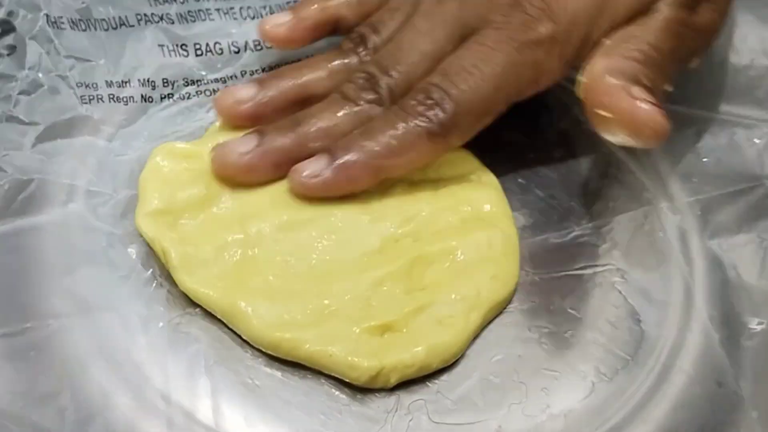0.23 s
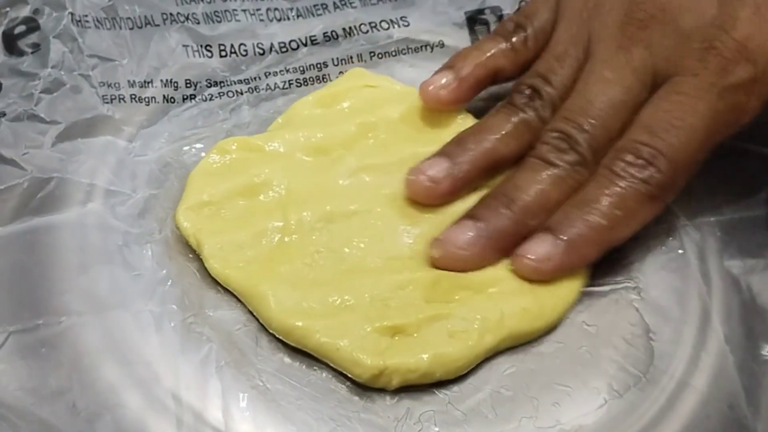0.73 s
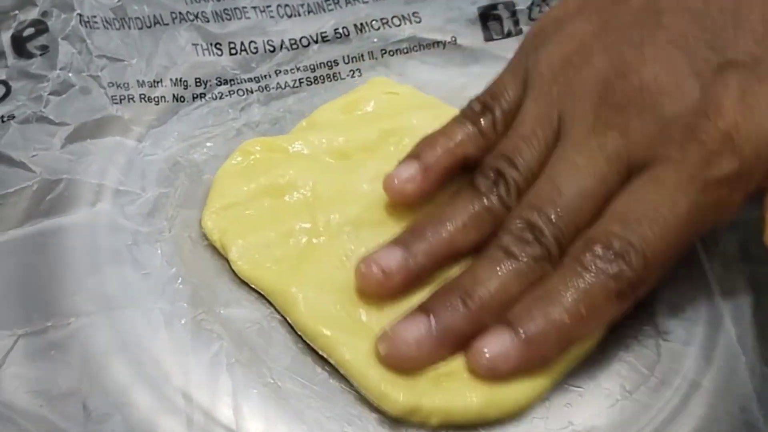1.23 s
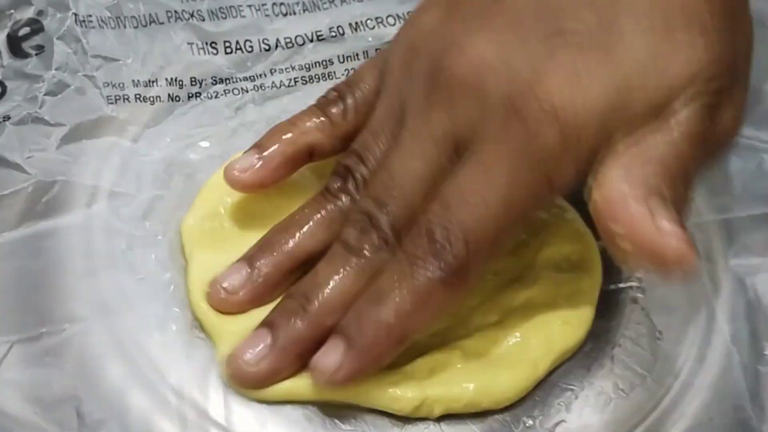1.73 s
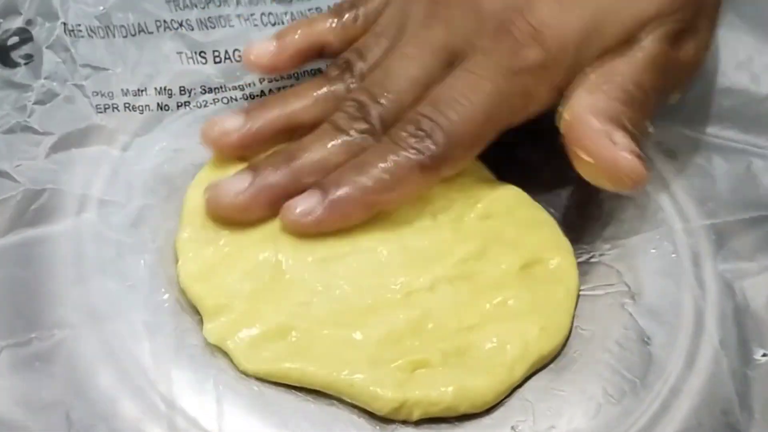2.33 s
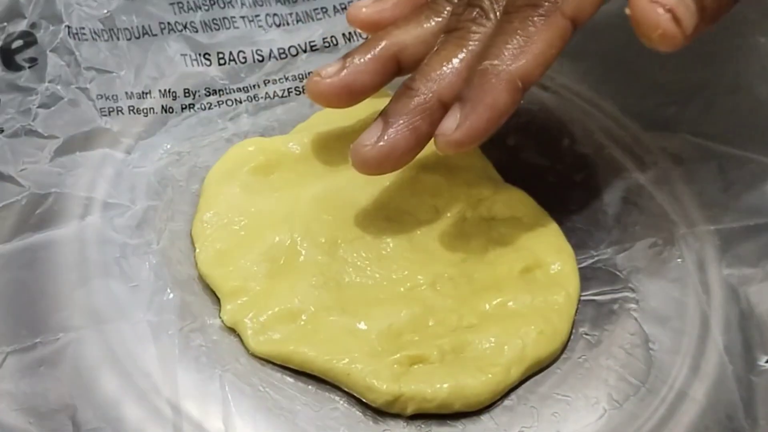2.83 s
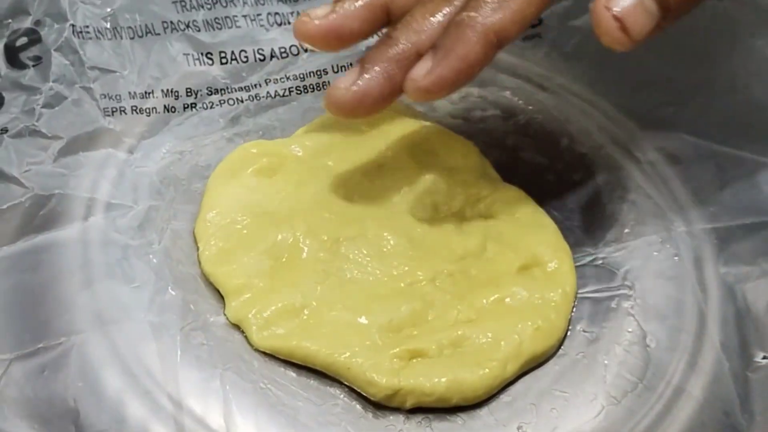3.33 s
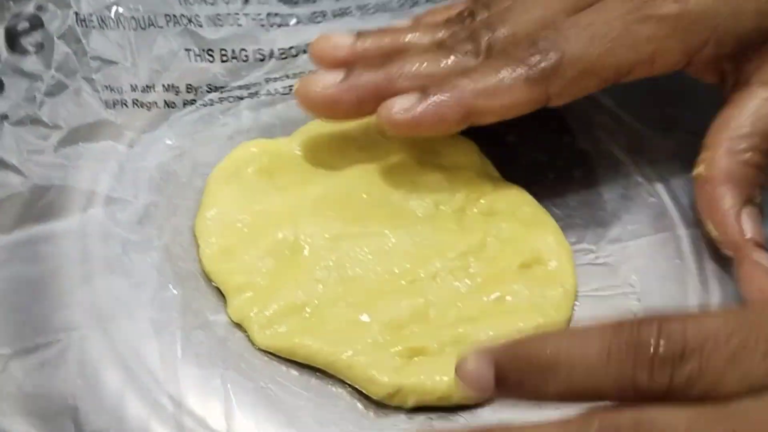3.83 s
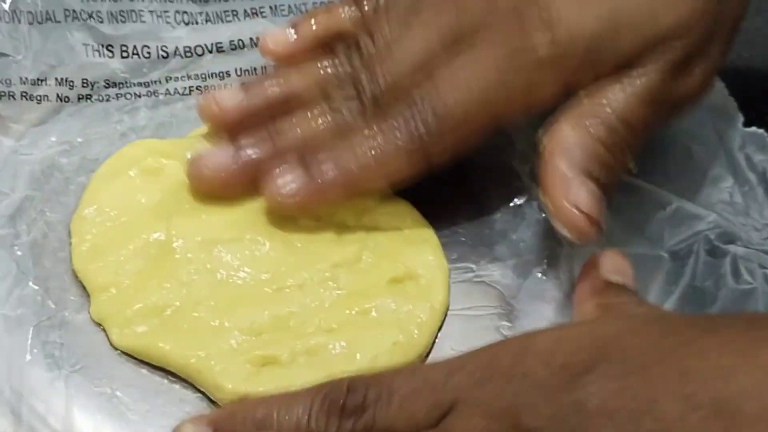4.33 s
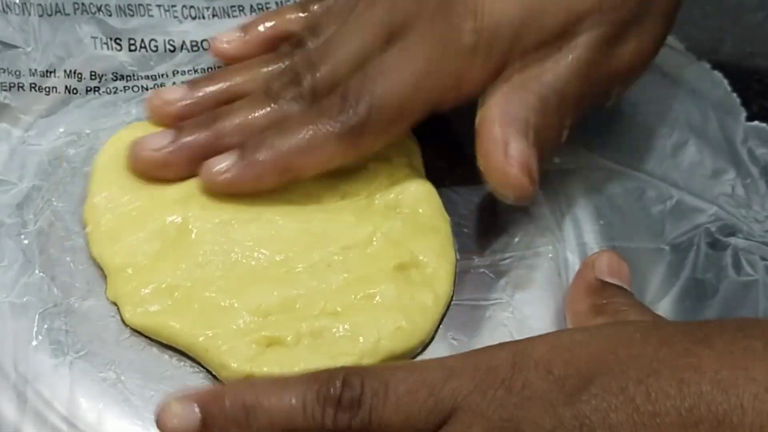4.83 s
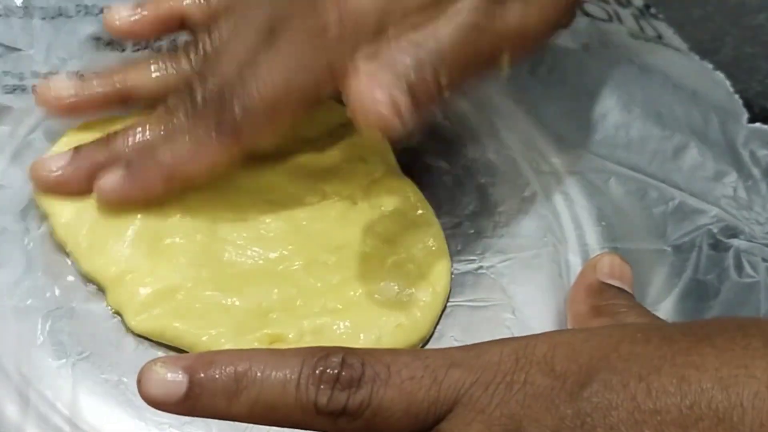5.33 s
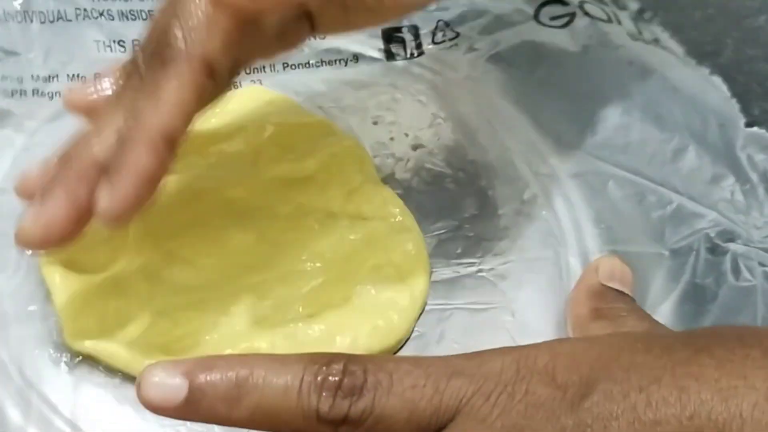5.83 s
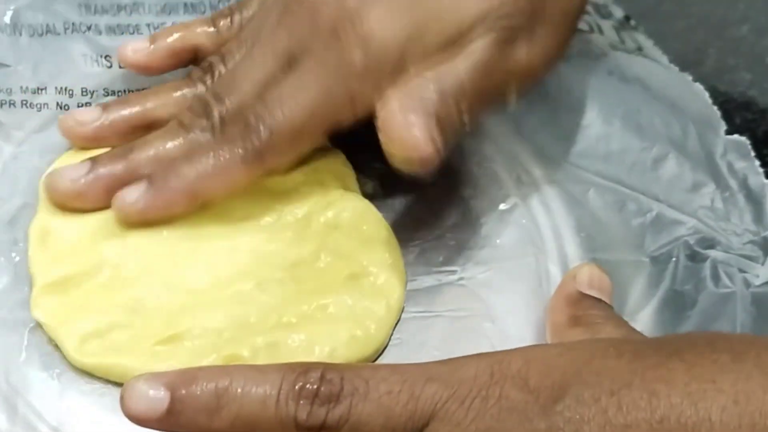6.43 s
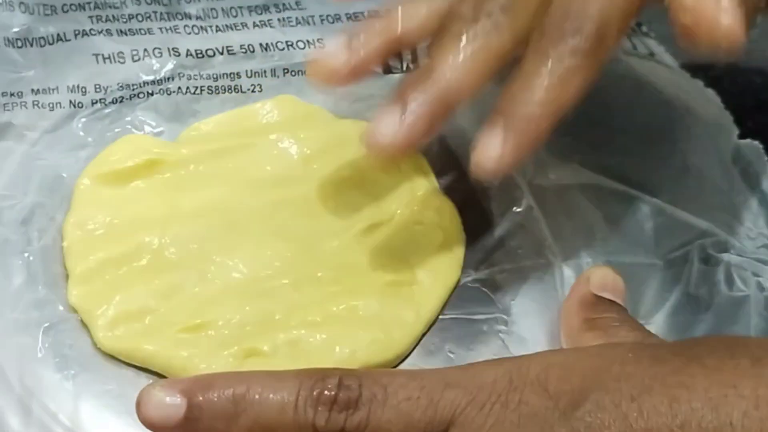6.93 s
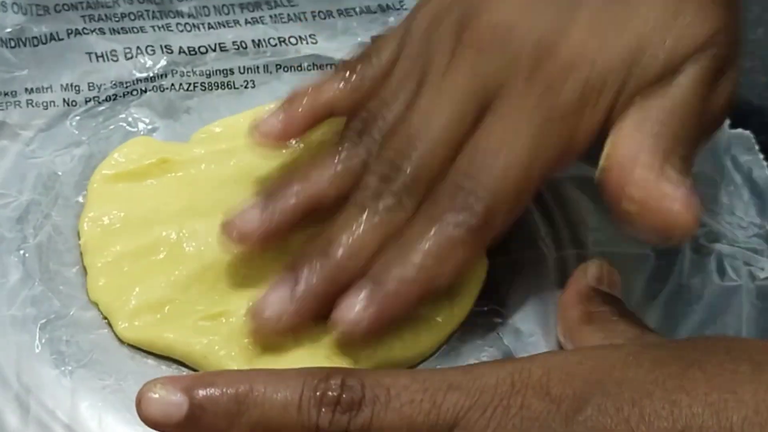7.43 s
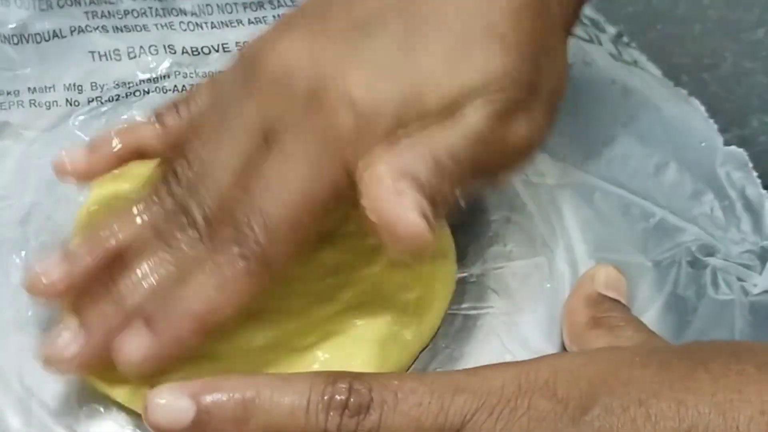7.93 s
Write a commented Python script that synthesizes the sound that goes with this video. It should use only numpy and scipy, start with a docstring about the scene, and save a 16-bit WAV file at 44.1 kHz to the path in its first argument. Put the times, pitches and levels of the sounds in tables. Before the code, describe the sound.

Stereo close pickup of plastic crinkling under greasy hands, with small sharp snaps and faint low pats on dough. Near the start a steel vessel knocks down a little way off, by far the loudest event, ringing under a second. Rustling comes and goes, busiest in the middle, with a tiny skin squeak; near the end it thins out over hum, hiss, a steady cricket and a lower insect trill.

```python
"""Oiled hands work dough on a plastic sheet over a steel plate, in a small hard-walled kitchen.
Pats on the dough and light finger taps through the plate are dull tones with sagging pitch; the sheet
rustles in clouds of tiny ticks and snaps in short noise bursts as fingers stick, peel off and turn it.
Skin squeaks briefly. Early on a steel vessel is knocked down and rings as a sum of fading tones.
Behind it all, shaped noise makes a room hum with hiss, a pulsing cricket and a late, lower trill."""
import sys
import numpy as np
from scipy import signal
from scipy.fft import rfft, irfft, next_fast_len
from scipy.io import wavfile
from scipy.ndimage import uniform_filter1d, map_coordinates

SR = 44100
rng = np.random.default_rng(int(sys.argv[2]) if len(sys.argv) > 2 else 0)


def digitize_waveform(pressure):
    """Quantize a signal to 16-bit integers and store it at the path in sys.argv[1].

    Rows of a 2-D input are taken as channels; values are limited to [-1, 1].
    """
    field = np.atleast_2d(pressure).T
    bounded = np.clip(field, -1, 1)
    quanta = np.round(bounded * 32767).astype(np.int16)
    wavfile.write(sys.argv[1], SR, quanta)


N = 360297  # length in samples


def amp(db):
    """Turn decibels into a gain."""
    return 10 ** (np.asarray(db) / 20)


def unit(x):
    """Scale a sound to an rms level of 1."""
    return x / np.sqrt(np.mean(x ** 2) + 1e-20)


def along(points, hz):
    """Read a curve of (f/Hz, value) points, with straight lines on a log frequency axis."""
    f, value = np.transpose(points)
    return np.interp(np.log(hz + 1), np.log(f + 1), value)


def wobble(rate):
    """A smooth random curve through `rate` random points a second."""
    knots = rng.standard_normal(int(N * rate / SR) + 4)
    return map_coordinates(knots, [np.arange(N) * rate / SR])


def filtered(x, response):
    """Weaken or strengthen each frequency of x by response(hz)."""
    n = x.shape[-1]
    padded = next_fast_len(n + SR // 10)
    hz = np.fft.rfftfreq(padded, 1 / SR)
    return irfft(rfft(x, padded) * response(hz), padded)[..., :n]


def resonance(hz, centre, width):
    """Response of one damped vibration, strongest at its centre frequency."""
    return 1j * hz * width / (centre ** 2 - hz ** 2 + 1j * hz * width)


def add(track, s, sound):
    """Mix a sound into the track at time s, cut off at the track's end."""
    part = track[..., round(s * SR):][..., :sound.shape[-1]]
    part += sound[..., :part.shape[-1]]


# how alike sound from all sides is at the left and right ports: f/Hz, likeness (1 same, -1 opposite)
LIKENESS = [(130, 0.96), (290, 0.85), (640, -0.058), (1400, -0.52), (3000, -0.14), (6000, -0.09)]


def diffuse(size):
    """White noise from all sides: a shared part plus a part of opposite sign at the two ports."""
    def mid_and_side(hz):
        angle = np.arccos(np.clip(along(LIKENESS, hz), -1, 1)) / 2
        return np.array([np.cos(angle), np.sin(angle)])

    mid, side = filtered(rng.standard_normal((2, size)), mid_and_side)
    return np.array([mid + side, mid - side])


# how long the kitchen's echo takes to fall by 60 dB: f/Hz, fall time t/s
KITCHEN_DECAY = [(120, 0.39), (400, 0.73), (1500, 0.57), (3500, 0.68), (7000, 0.44), (14000, 0.38)]


def in_room(x, wet_db):
    """Hard walls return a dense echo that dies at its own speed at each pitch, added to the direct sound."""
    hz, t, pieces = signal.stft(diffuse(size=SR * 2 // 3), SR, nperseg=256)
    fade = amp(-60 * t / along(KITCHEN_DECAY, hz)[:, None])
    build_up = 1 - np.exp(-t / 0.00087)
    tail = signal.istft(pieces * fade * build_up, SR, nperseg=256)[1]
    response = amp(wet_db) * tail / np.linalg.norm(tail[0])
    response[:, 0] += 1  # the direct sound
    return signal.fftconvolve(np.atleast_2d(x), response, axes=1)[:, :N]


# colour of the room hum and hiss: f/Hz, relative level/dB
AIR_COLOUR = [(20, -24), (35, -19), (52, 2.5), (72, -19), (100, 6), (125, -9.5), (160, 0), (230, -5.5),
              (335, -0.5), (400, -12.5), (1400, -14), (2300, -17.5), (3350, -16), (4500, -20),
              (9500, -20.5), (12000, -27), (15500, -29)]


def room_tone():
    """Low hum of the house under a steady hiss: shaped noise from all sides, barely wavering."""
    air = unit(filtered(diffuse(size=N), lambda hz: amp(along(AIR_COLOUR, hz))))
    return amp(-48.5 + 0.38 * wobble(1.99)) * air


# trills of the second cricket: middle t/s, level/dB before placing left and right
TRILL_EVENTS = [(7.22, -59.5), (7.9, -56)]
TRILL_FADE_DB_PER_S = 48  # each trill swells and fades evenly


def crickets():
    """Off to the left, one narrow noise band pulses evenly; a lower, narrower one swells late on."""
    t = np.arange(N) / SR
    beat_db = 3.6 * np.cos(2 * np.pi * 3.93 * (t - .9)) + .8 * wobble(3)  # 3.93 pulses a second

    def voice(centre_hz, width_hz):
        return unit(filtered(diffuse(size=N), lambda hz: resonance(hz, centre_hz, width_hz) ** 2))

    chirps = amp(-56.5 + beat_db) * voice(centre_hz=8210, width_hz=850)
    swells = sum(amp(db - TRILL_FADE_DB_PER_S * np.abs(t - s)) for s, db in TRILL_EVENTS)
    trill = swells * voice(centre_hz=7370, width_hz=220)
    return (chirps + trill) * amp([[1.5], [-4]])  # left, right


def crackle(spectrum, density, spread_db, life, size=200):
    """Countless tiny fading ticks (density a second), each with its own size, pitch and place; rms 1."""
    chance = rng.random((24000, 5))[:int(density * N / SR)]
    start, tone, strength, left, right = chance.T[:, :, None]
    low_hz, high_hz = spectrum[0][0], spectrum[-1][0]
    hz = low_hz + (high_hz - low_hz) * tone ** 2
    t = np.arange(size) / SR
    # low ticks are more numerous; the square root makes the high ones stronger
    size_db = spread_db * np.minimum(-np.log(strength), 3)
    gain = amp(along(spectrum, hz) + size_db) * np.sqrt(tone)
    shape = gain * np.exp(-t / life) * (1 - np.exp(-t * hz))
    where = ((start * N).astype(int) + np.arange(size)).ravel()
    ports = []
    for phase in (left, right):
        ticks = shape * np.sin(2 * np.pi * (hz * t + phase))
        ports.append(np.bincount(where, ticks.ravel(), N)[:N])
    return unit(np.array(ports))


GRIP_S, RELAX_DB_PER_S = 0.009, 287  # the fingers take hold quickly; the let-go sheet settles


def stroke_envelope(hold_s):
    """Rise as the fingers grip, hold while they push, fade as the sheet relaxes."""
    t = np.arange(int((hold_s + .25) * SR)) / SR
    return np.minimum(t / GRIP_S, 1) * amp(-RELAX_DB_PER_S * np.maximum(t - hold_s, 0))


# strokes of the hand that crease the sheet:
# start t/s, time until let go t/s, relative rustle level/dB, fine wrinkles relative to rustle level/dB
STROKE_EVENTS = [(0.01, 0.2, -48.5, -5.5), (0.098, 0.017, -37.5, -7), (0.222, 0.042, -49, 3),
                 (1.825, 0.013, -42, 1), (1.905, 0.024, -39, -4), (2.036, 0.044, -40, -0.5),
                 (2.197, 0.043, -40.5, -4.5), (2.285, 0.035, -43.5, -7), (2.4, 0.13, -52.5, -8),
                 (2.634, 0.056, -40.5, -6), (2.721, 0.035, -40.5, -3), (3.17, 0.045, -56, 9),
                 (3.312, .02, -52.5, 9), (3.972, 0.098, -34.5, -4), (4.112, 0.084, -43.5, -16),
                 (4.179, .065, -41, -5.5), (4.276, 0.016, -49, -3), (4.473, .012, -44, 6),
                 (4.505, 0.028, -44.5, 0), (5.175, 0.049, -42.5, -5.5), (5.337, 0.054, -51, 5.5),
                 (5.512, 0.049, -36.5, -2), (5.594, 0.047, -39.5, -6), (5.897, 0.089, -41.5, -5.5),
                 (6.169, 0.021, -42, -2), (6.259, .05, -39, -3), (6.305, .08, -41, -4),
                 (6.494, 0.012, -44.5, -3), (6.57, 0.083, -53, 3), (6.647, .03, -40, -18),
                 (6.71, .06, -54, -14), (7.991, 0.096, -45, 4)]
# colour of the broad folds: f/Hz, relative level/dB
FOLD_COLOUR = [(250, -8), (500, -13), (750, 7), (1300, 1), (2000, 2), (3500, -6), (5000, -9.5),
               (8000, -17.5)]
# colour of the fine wrinkles, also used for the snaps' ticks: f/Hz, relative level/dB
WRINKLE_COLOUR = [(2000, -8), (4500, -2.5), (6500, -2.5), (9000, -5.5), (12000, -11.5), (15000, -14.5)]
STICK_DB, STICK_PER_S = 1.35, 45  # oily skin sticks and slips: size of the wavering, random points a second


def rustle():
    """The oily sheet drags and peels: broad folds crackle, fine wrinkles fizz, the plate rumbles."""
    folds, wrinkles = np.zeros((2, N))
    for s, hold_s, db, crisp_db in STROKE_EVENTS:
        effort = amp(db) * stroke_envelope(hold_s)
        add(folds, s, effort)
        add(wrinkles, s, amp(crisp_db) * effort)
    fold_ticks = crackle(FOLD_COLOUR, density=2400, spread_db=2.0, life=0.0009, size=150)
    wrinkle_ticks = crackle(WRINKLE_COLOUR, density=2200, spread_db=0.5, life=0.00095, size=100)
    sheet = amp(-3.5) * folds * fold_ticks + amp(-4.0) * wrinkles * wrinkle_ticks
    rumble = unit(filtered(rng.standard_normal(N), lambda hz: resonance(hz, 95, 81) ** 2))
    push = amp(-18) * folds * rumble
    return in_room(sheet * amp(STICK_DB * wobble(STICK_PER_S)), wet_db=-7.0) + push


# snaps of the sheet: t/s, relative fold level/dB, fold f/Hz, relative tick level/dB
SNAP_EVENTS = [(0.102, -24, 1830, -43), (0.1138, -27, 1920, -44), (0.231, -26.5, 3580, -40),
               (0.2402, -28, 3120, -37), (1.9106, -32, 2430, -35.5), (2.1976, -22, 5370, -38),
               (2.3061, -27, 3670, -48), (2.513, -32, 3170, -42), (2.6447, -29, 3080, -38),
               (2.7431, -26.5, 1440, -36.5), (4.0023, -30, 2980, -34), (4.0342, -20, 1900, -32),
               (4.0792, -27, 2710, -32), (4.4794, -29.5, 3500, -33.5), (4.5166, -33, 3660, -36),
               (4.5373, -24, 7950, -38), (5.1507, -29.5, 3860, -52), (5.4906, -27.5, 2000, -46),
               (5.5261, -21.5, 2150, -31), (5.5677, -34, 3130, -35), (5.627, -24.5, 1310, -35),
               (5.879, -36, 7900, -35), (5.9093, -27.5, 2850, -38), (5.9851, -24.5, 3120, -32),
               (6.111, -28.5, 4600, -41.5), (6.1855, -39, 2980, -33.5), (6.3265, -21, 2100, -35),
               (6.3799, -27.5, 2950, -38), (6.5023, -29.5, 3740, -43), (6.6682, -25, 3570, -32),
               (8.0344, -26.5, 3920, -45)]


def snaps():
    """A wrinkle buckles: a sharp tick together with a short noisy ring at the pitch of the fold."""
    out, t = np.zeros((2, N)), np.arange(SR // 30) / SR
    for s, db, hz, tick_db in SNAP_EVENTS:
        fold, tick = rng.standard_normal((2, 2, len(t)))
        fold = unit(filtered(fold, lambda f: resonance(f, hz, 0.4 * hz))) * amp(-60 * t / 0.046)
        tick = unit(filtered(tick, lambda f: amp(along(WRINKLE_COLOUR, f)))) * amp(-60 * t / 0.016)
        add(out, s, amp(db - 10.5) * fold + amp(tick_db + 3) * tick)
    return in_room(out, wet_db=-0.5)


# main ringing tones of the steel vessel, with a low tone of the counter:
# f/Hz, relative level/dB, time to fall by 60 dB t/s
RING_MODES = [(157, -11, 0.4), (256.3, -10.5, 0.41), (349.5, -11, 0.86), (424, -10.5, 0.88),
              (667, -15, 0.45), (787, -13, 0.58), (890, -8, 0.38), (1132, -4, 0.36), (1210, -19, 1),
              (1296, -17.5, 0.93), (1400, -18, 0.23), (1778, -11, 0.66), (1823, -11.5, 0.68),
              (1890, -18, 1), (2105, -9, 0.5), (2460, -24, 1), (2906, -11.5, 0.79), (2930, -2.5, 0.78),
              (2980, -1.5, 0.5), (3460, -23, 0.13), (3692, -12.5, 0.74), (3735, -6.5, .62),
              (4400, -23, 0.49), (4454, -17, .6), (5080, -12, 0.51)]


def steel_ring(t, count=48):
    """The main tones of vessel and counter fade over many weak ones; phases differ from port to port."""
    weak_hz = rng.uniform(500, 8500, count)
    weak_db = rng.normal(-18, 3, count) - 1.4 * weak_hz / 1000
    weak = np.transpose([weak_hz, weak_db, rng.uniform(.25, .5, count)])
    hz, db, t60 = np.vstack([RING_MODES, weak]).T[:, :, None]
    shared_phase = rng.uniform(0, 2 * np.pi, len(hz))
    port_phase = np.pi / 5 * rng.standard_normal((2, len(hz)))
    phase = np.exp(1j * (shared_phase + port_phase))
    modes = amp(db - 60 * t / t60) * np.exp(2j * np.pi * hz * t)
    return (phase @ modes).real * (1 - np.exp(-t / 0.0028))


# a knock, the vessel clattering down, then a light double tap; one row per contact:
# t/s, crack level/dB, crack brightness f/Hz, contact tone f/Hz, contact tone level/dB,
# relative ring level/dB
KNOCK_EVENTS = [(.3222, -11, 1540, 270, -17.5, -52), (.336, -32, 1520, 1145, -21, -62),
                (.553, -16.5, 900, 624, -23, -43), (.564, -27, 7800, 1100, -20, -13),
                (.5678, -7.5, 2440, 405, 1.5, -9.5), (.5835, -3, 2350, 1183, -8, -39),
                (.5885, -8.5, 4000, 698, -9, -23), (.599, -14, 6740, 250, -17, -28),
                (.62, -13, 5100, 350, -19, -29.5), (1.515, -23.5, 1390, 310, -24.5, -61),
                (1.536, -21.5, 1110, 490, -23, -63), (1.541, -30, 1150, 690, -24, -66),
                (1.546, -26.5, 1200, 1070, -29.5, -58)]


def knocks():
    """Each blow cracks, gives a short fading tone, low or high, and rings the steel, a little way off."""
    out, t = np.zeros((2, N)), np.arange(SR // 8) / SR
    ring = steel_ring(np.arange(SR) / SR)
    for s, crack_db, bright_hz, tone_hz, tone_db, ring_db in KNOCK_EVENTS:
        def contact(hz):
            # weak lows, then a springy contact that passes sound up to its own resonance
            low_cut = (1j * hz / (150 + 1j * hz)) ** 2
            return low_cut / (1 - (hz / bright_hz) ** 2 + 1j * hz / bright_hz)

        burst = rng.standard_normal((2, len(t))) * amp(-60 * t / 0.049)
        crack = filtered(burst, contact)
        soft_start = (1 - np.exp(-t / 0.0015)) ** 2
        tone = np.sin(2 * np.pi * tone_hz * t) * amp(-60 * t / 0.04) * soft_start
        add(out, s, in_room(amp(crack_db) * crack, wet_db=-2.0))
        add(out, s, in_room(amp(tone_db) * tone, wet_db=-5))
        add(out, s, in_room(amp(ring_db - 9.5) * ring, wet_db=-3.5))
    return out


# soft pats on the dough and light dull finger taps through the plate:
# t/s, relative tone level/dB, base f/Hz, relative skin slap level/dB
PAT_EVENTS = [(1.309, -51, 300, -45.5), (2.449, -55, 350, -44.5), (2.618, -45, 290, -40),
              (2.742, -42, 120, -44), (3.029, -44, 245, -48.5), (3.137, -44, 107, -43),
              (3.279, -27, 169.3, -44), (3.404, -32, 162, -53), (3.999, -41, 379, -40),
              (4.099, -44.5, 350, -37), (4.284, -40, 306, -39), (4.738, -44, 91.5, -53),
              (4.953, -44, 160, -51), (5.178, -33, 119, -45), (5.215, -34, 189, -54),
              (5.519, -40, 320, -54), (5.59, -39, 92, -56), (6.824, -36, 149, -46),
              (7.228, -32.5, 158, -53)]
PAT_T60_S = 0.15  # every pat and tap dies at the same speed: time to fall by 60 dB


def pats():
    """Fingers pat the dough or tap the plate: a dull slap and a soft-edged tone whose pitch sags."""
    out, t = np.zeros(N), np.arange(SR // 3) / SR
    for s, db, hz, slap_db in PAT_EVENTS:
        pitch = hz * (.93 + 0.34 * np.exp(-t / 0.011))
        soft_start = 1 - np.exp(-t / 0.006)
        tone = np.sin(2 * np.pi * np.cumsum(pitch) / SR) * soft_start * amp(-60 * t / PAT_T60_S)
        skin = unit(filtered(rng.standard_normal(len(t)), lambda f: resonance(f, 540, 640) ** 2))
        slap = skin * amp(-60 * t / 0.1)
        add(out, s, amp(db + 2.5) * tone + amp(slap_db - 3.0) * slap)
    return in_room(out, wet_db=-7.5)


# oily skin slipping on the sheet: start t/s, length t/s, f/Hz, relative level/dB
SQUEAK_EVENTS = [(5.914, 0.027, 2860, -46), (5.937, 0.027, 2870, -45.5), (5.97, 0.039, 3450, -45.5)]


def squeaks():
    """A fingertip sticks and slips: a brief, rough chirp made of narrow-band noise."""
    out = np.zeros(N)
    for s, length, hz, db in SQUEAK_EVENTS:
        swell = np.hanning(int(length * SR))
        chirp = unit(filtered(rng.standard_normal(SR // 10), lambda f: resonance(f, hz, 420) ** 2))
        add(out, s, amp(db + 2) * swell * chirp[:len(swell)])
    return in_room(out, wet_db=-1)


def scene():
    """All sources together as they reach the two ports."""
    return knocks() + pats() + snaps() + squeaks() + rustle() + crickets() + room_tone()


def gain_control(x, threshold_db, recover_db, attack):
    """Loud sound turns the gain down over a moment; it creeps back, recover_db a second."""
    power = np.abs(uniform_filter1d((x ** 2).mean(0), size=SR // 25))
    over = np.clip(10 * np.log10(power + 1e-12) - threshold_db, 0, 4)  # at most 4 dB down
    creep = recover_db * np.arange(N) / SR
    duck_db = np.maximum.accumulate(over + creep) - creep
    keep = np.exp(-1 / (attack * SR))
    return x * amp(-signal.lfilter([1 - keep], [1, -keep], duck_db))


# colour of the left port over the right, shared out between them: f/Hz, level difference/dB
PORT_COLOUR = [(200, -1.5), (450, 2.5), (740, -1.5), (1300, 3), (2000, 0), (3200, 12), (4500, 1.5),
               (6000, -0.5), (8300, 6.5), (11000, -3), (15000, 7.5)]
TOP_HZ = 15700  # nothing passes from here up


def record(dry):
    """The ports colour the sound; gain control, soft overload and the band limit follow."""
    shares = np.array([[.8], [-.2]])  # left, right
    heard = filtered(dry, lambda hz: amp(along(PORT_COLOUR, hz) * shares))
    held = gain_control(heard, threshold_db=-16, recover_db=2.5, attack=0.04)
    overloaded = held / (1 + held ** 6) ** (1 / 6)
    return filtered(overloaded, lambda hz: hz < TOP_HZ)


dry = scene()
out = record(dry)
digitize_waveform(out)
```